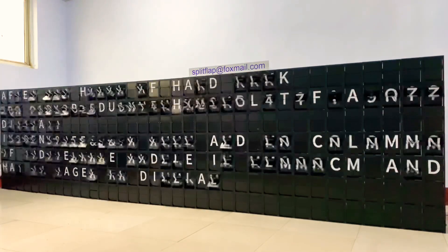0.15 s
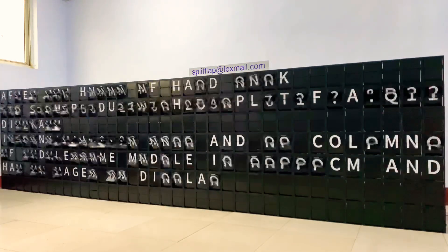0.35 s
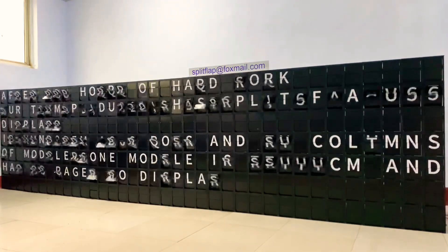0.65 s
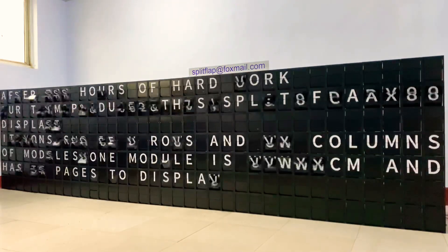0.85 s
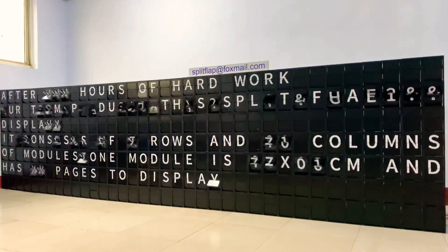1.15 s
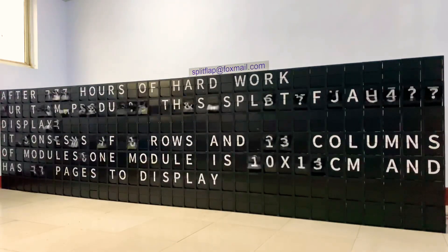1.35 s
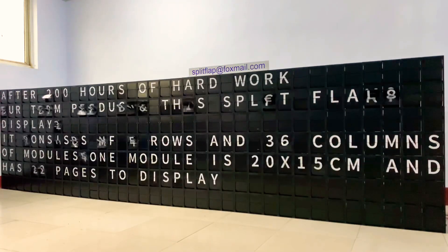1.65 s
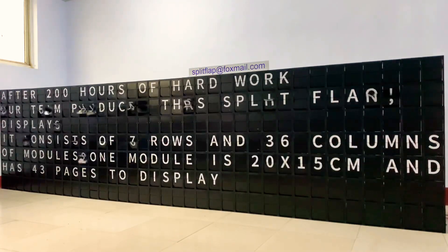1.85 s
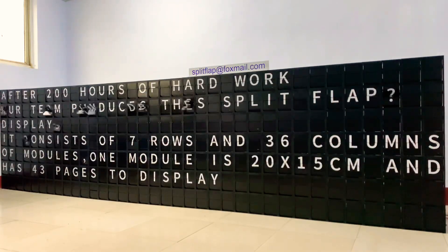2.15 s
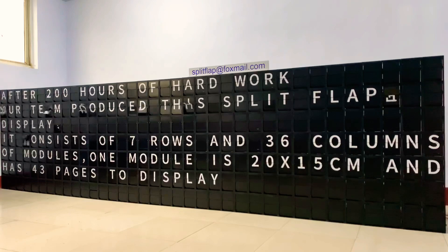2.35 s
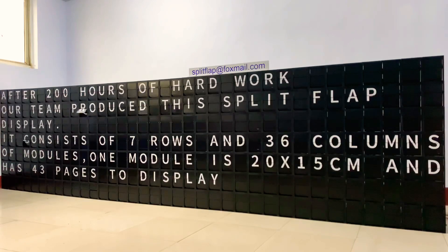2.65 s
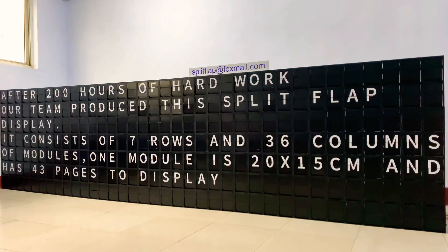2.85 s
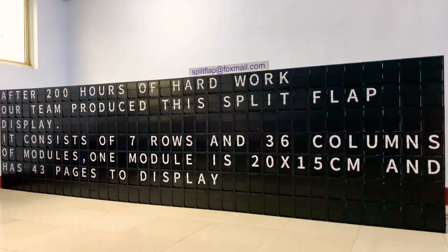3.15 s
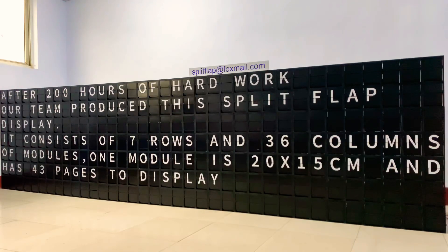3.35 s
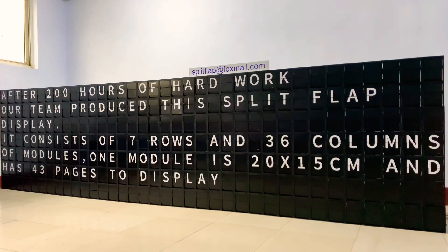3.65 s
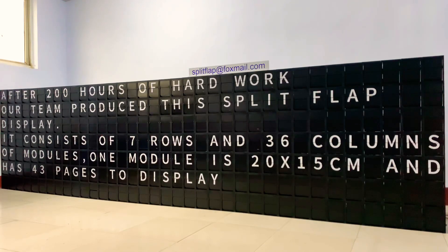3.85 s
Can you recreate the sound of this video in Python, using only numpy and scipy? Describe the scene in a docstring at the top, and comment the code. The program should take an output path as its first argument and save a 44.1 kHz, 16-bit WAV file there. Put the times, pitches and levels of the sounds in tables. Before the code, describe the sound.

A wall-sized split-flap display clatters densely in a bare, echoing room, heard in stereo from a few metres; flaps snap and knock, gradually thin out, tick to a stop, and leave faint low hum and room noise.

```python
"""Plastic flaps clatter on a wall-sized split-flap display in a bare room, heard from a few metres.
Each module drops about 13 flaps a second: short noise snaps that bounce, ring and echo in the room.
Landings also shake the cabinet: low filtered thuds and knocks. Some flaps land hard and stand out.
One by one the modules reach their letters and stop, leaving a wavering low hum (a sine)
and faint room noise (filtered noise) with a soft rush."""
import sys
import numpy as np
from scipy import signal
from scipy.fft import rfft, irfft, next_fast_len
from scipy.io import wavfile

SR = 44100
rng = np.random.default_rng(int(sys.argv[2]) if len(sys.argv) > 2 else 0)


def master(y):
    """Save y as 16-bit WAV."""
    cut = np.clip(np.atleast_2d(y).T, -1, 1)
    pcm = np.round(cut * 32767)  # scale
    wavfile.write(sys.argv[1], SR, pcm.astype(np.int16))


N = 176400  # length in samples: 4 s


def from_db(db):
    """Turn decibels into a gain."""
    return 10 ** (np.asarray(db) / 20)


def rms_one(x):
    """Scale to an rms of one."""
    return x / np.sqrt(np.mean(x ** 2) + 1e-20)


def at_time(rows, t):
    """Read a curve at the given times, with straight lines between its points."""
    return np.interp(t, *np.transpose(rows))


def at_hz(rows, hz):
    """Read a curve over frequency, with pitch steps (log frequency) as the scale."""
    f, value = np.transpose(rows)
    return np.interp(np.log(hz + 1e-9), np.log(f), value)


def colour(x, gain_at):
    """Filter by a gain that depends on frequency."""
    size = next_fast_len(x.shape[-1] + SR // 4)
    hz = np.fft.rfftfreq(size, 1 / SR)
    return irfft(rfft(x, size) * gain_at(hz), size)[..., :x.shape[-1]]


def body(spectrum, resonances, hz):
    """Gain of a broad spectrum with resonant peaks; white noise keeps its power."""
    lift = sum(db / (1 + (2 * (hz - f) / width) ** 2) for f, width, db in resonances)
    return rms_one(from_db(at_hz(spectrum, hz) + lift))


def drift(rate_hz):
    """Random wavering of spread 1; a higher rate makes it quicker."""
    return rms_one(colour(rng.standard_normal(N), lambda hz: np.exp(-hz / rate_hz)))


# How alike left and right are in sound from all around: f/Hz, correlation
EAR_LIKENESS = [(60, 0.9), (250, 0.87), (450, 0.42), (800, 0.17), (2000, 0.014), (14000, .02)]


def diffuse(size):
    """Stereo noise from all around: alike in the bass, nearly unrelated in the treble."""
    mid, side = rng.standard_normal((2, size))
    mid = colour(mid, lambda hz: np.sqrt(1 + np.clip(at_hz(EAR_LIKENESS, hz), -1, 1)))
    side = colour(side, lambda hz: np.sqrt(1 - np.clip(at_hz(EAR_LIKENESS, hz), -1, 1)))
    return np.array([mid + side, mid - side])


# How long the room's echo takes to fall by 60 dB: f/Hz, decay time/s
ECHO_DECAY = [(100, 1), (500, 0.8), (2000, 0.54), (5000, 0.48), (14000, 0.3)]


def room(x, wet_db):
    """Add a diffuse tail that dies sooner in the treble, then scale down to make up for it."""
    t, noise, tail = np.arange(SR) / SR, rfft(diffuse(SR)), 0
    edges = np.geomspace(20, 20000, 11)
    hz = np.fft.rfftfreq(SR, 1 / SR)
    for low, high in zip(edges, edges[1:]):
        decay = from_db(-60 * t / at_hz(ECHO_DECAY, np.sqrt(low * high)))
        band = irfft(noise * (hz >= low) * (hz < high), SR)
        tail = tail + band * decay / np.linalg.norm(decay)
    wet = from_db(wet_db)
    echo = signal.fftconvolve(x, tail, axes=1)[:, :x.shape[1]]
    return (x + wet * echo) / np.hypot(1, wet)


# Colour of the room noise: f/Hz, relative level/dB
AIR_COLOUR = [(25, -12), (42, 3), (60, -8.5), (95, 2.5), (115, -6.5), (150, -11.5), (290, -14), (390, -16),
              (560, -17.5), (840, -24), (1280, -33), (1600, -29), (2000, -32.5), (2900, -33), (4300, -34),
              (6000, -36.5), (8500, -37), (10300, -35), (14400, -38)]
# Faint ringing bands in it: f/Hz, width/Hz, lift/dB
AIR_RINGING = [(569, 13, 8.5), (1282, 124, 13), (2014, 120, 12.5), (2470, 79, 5), (4100, 580, 2.5)]
# Its loudness over time, before the stereo mix and wavering: t/s, level/dB
AIR_LOUDNESS = [(0, -75), (3.1, -70), (3.45, -71), (4, -71)]
AIR_WAVER_DB, AIR_WAVER_HZ = .4, 12


def air():
    """Faint, slightly wavering rumble and hiss of the room: noise filtered into a few ringing bands."""
    noise = colour(diffuse(N), lambda hz: body(AIR_COLOUR, AIR_RINGING, hz))
    level_db = at_time(AIR_LOUDNESS, np.arange(N) / SR) + AIR_WAVER_DB * drift(AIR_WAVER_HZ)
    return noise * from_db(level_db)


# Loudness of the soft rush over time, before the stereo mix: t/s, level/dB
RUSH_LOUDNESS = [(0, -100), (3.45, -96), (3.63, -79), (3.74, -88), (3.93, -77), (4, -76)]
# Its dull colour: f/Hz, relative level/dB
RUSH_COLOUR = [(100, -19), (280, -4), (550, 0), (720, -5), (1000, -14), (2500, -34), (8000, -50)]


def swell():
    """A soft, dull rush that comes and goes late in the background: noise with little treble."""
    noise = colour(diffuse(N), lambda hz: body(RUSH_COLOUR, [], hz))
    return noise * from_db(at_time(RUSH_LOUDNESS, np.arange(N) / SR))


# Loudness of the low hum, before trim and flutter: t/s, level/dB
HUM_LOUDNESS = [(0, -51), (2.3, -56.5), (2.55, -53), (2.85, -53.5), (3.15, -56), (3.28, -65), (3.42, -70),
                (3.53, -63.5), (3.66, -73), (3.8, -68), (3.9, -58), (4, -59)]
HUM_HZ, HUM_WANDER_HZ, HUM_WANDER_RATE_HZ = 80.6, 2.31, 7.3
HUM_TRIM_DB, HUM_FLUTTER_DB, HUM_FLUTTER_HZ = -3.5, 2, 30


def hum():
    """A low sine whose pitch wavers and whose loudness flutters, swells and sinks."""
    pitch_hz = HUM_HZ + HUM_WANDER_HZ * drift(HUM_WANDER_RATE_HZ)
    phase = 2 * np.pi * np.cumsum(pitch_hz) / SR
    level_db = HUM_TRIM_DB + at_time(HUM_LOUDNESS, np.arange(N) / SR)
    level_db = level_db + HUM_FLUTTER_DB * drift(HUM_FLUTTER_HZ)
    return np.sqrt(2) * np.sin(phase) * from_db(level_db)


# Colour of the cabinet's thud: f/Hz, relative level/dB
THUD_COLOUR = [(25, -23), (45, -9), (62, 1.5), (85, -4.5), (110, 1.5), (150, -3.5), (200, -0.5), (290, 1),
               (400, -1), (520, -3), (700, -14), (1500, -24), (5000, -73)]
# Resonances of flaps and housings: f/Hz, width/Hz, lift/dB
HOUSING_RESONANCES = [(270, 30, 1), (910, 74, -1), (1083, 20, 1.5), (2080, 62, 4), (3610, 160, 5),
                      (4750, 220, -2.5), (8730, 750, 2.5)]
THUD_ROOM_DB = -0.5


def cabinet(clicks):
    """The low, boxy answer of the cabinet to the landing flaps, in the room."""
    boxy = colour(clicks, lambda hz: body(THUD_COLOUR, HOUSING_RESONANCES, hz))
    return room(boxy, THUD_ROOM_DB)[:, SR:]


# Heavier knocks of the cabinet, before the room: t/s, level/dB (of the whole knock's energy)
CABINET_KNOCKS = [(0.044, -14), (0.193, -13), (0.283, -13), (0.422, -12.5), (0.474, -23), (0.582, -28),
                  (0.725, -11), (0.806, -25), (0.862, -20), (1.165, -19), (1.902, -22.5), (2.552, -24),
                  (2.72, -28), (2.796, -29), (2.818, -30), (2.94, -35)]
KNOCK_RISE_S, KNOCK_TOP_HZ = 0.0029, 520


def knocks():
    """Heavier knocks stand out of the clatter: each a short, dull shudder of the cabinet."""
    t, out = np.arange(SR // 25) / SR, np.zeros(N + SR)
    dull = lambda hz: body(THUD_COLOUR, [], hz) / np.hypot(1, (hz / KNOCK_TOP_HZ) ** 3)
    for s, db in CABINET_KNOCKS:
        shudder = colour(rng.standard_normal(len(t)), dull)
        shudder *= t * np.exp(-t / KNOCK_RISE_S)  # swells, then dies away
        at = int((s + 1) * SR)
        out[at:at + len(t)] += from_db(db) * shudder / np.linalg.norm(shudder)
    return room(np.array([out, out]), wet_db=-3)[:, SR:]


BOUNCE_S, BOUNCE_LOSS_DB = .008, 4  # typical time between bounces, loss at each


def contacts(falls, count):
    """Stereo clicks, starting a second early: each flap lands and bounces, weaker every time."""
    s, strength, lag = falls.T
    out = np.zeros((2, N + SR))
    gap = rng.uniform(.5, 1.5, (count, len(s)))
    sign = rng.choice([-1, 1], (count, len(s)))
    for k in range(count):
        click = sign[k] * strength * from_db(-BOUNCE_LOSS_DB * k)
        for ear, delay in enumerate((lag, 0)):  # the left ear hears it later
            at = ((s + 1 + k * BOUNCE_S * gap[k] + delay) * SR).astype(int)
            np.add.at(out[ear], np.clip(at, 0, N + SR - 1), click)
    return out


WALL_LAG_S, WALL_LAG_SPREAD_S = .00028, .00008  # lag of the left ear, and its reach over the wall
SLAP_ROOM_DB = 10  # room tail of the slapping flaps
# Flaps of the last modules, before the room: t/s, level/dB
FINAL_FLAPS = [(2.709, -31.5), (2.718, -38), (2.728, -41), (2.742, -40), (2.765, -41), (2.785, -38),
               (2.8, -37), (2.82, -44)]
# Their colour: f/Hz, relative level/dB
FINAL_COLOUR = [(400, 6.5), (900, 4), (1500, 1), (2400, 0.5), (3500, -1.5), (5000, -3), (9000, -12),
                (14000, -17)]


def last_flaps():
    """The last modules tick on alone for a moment: bouncing clicks, coloured and echoing."""
    falls = np.array([(s, from_db(db), WALL_LAG_S) for s, db in FINAL_FLAPS])
    ticks = colour(contacts(falls, count=3), lambda hz: body(FINAL_COLOUR, [], hz))
    return room(ticks, SLAP_ROOM_DB)[:, SR:]


# Colour of the slapping flaps: f/Hz, relative level/dB
SLAP_COLOUR = [(300, -22), (500, -6), (650, -1.5), (900, 3), (1200, -1.5), (1480, 0), (1850, -5),
               (2100, -3), (2630, -4.5), (3600, -7.5), (4600, -7.5), (5300, -11.5), (8700, -13.5)]
# The same colour at the very top: f/Hz, relative level/dB
SLAP_TREBLE = [(10200, -14.3), (13300, -16), (14400, -17.5)]
# Flaps that land hard enough to stand out: t/s, level/dB (before the room), centre of the lift f/Hz
HARD_LANDINGS = [(.053, -22, 1500), (.332, -15, 1860), (.472, -26, 1100), (.684, -19.5, 1500),
                 (.761, -19, 2140), (1.057, -17, 1000), (1.575, -22, 1400), (1.736, -27, 2100),
                 (1.945, -26, 1200), (2.706, -34.5, 8900), (2.736, -36.5, 2800)]
CLACK_WIDTH_OCTAVES, CLACK_LIFT_DB, CLACK_ROOM_DB = 0.34, 10.5, 4.5


def clacks():
    """Hard landings, drier than the slaps, each lifted around a pitch of its own."""
    out = 0
    for s, db, centre_hz in HARD_LANDINGS:
        octaves = lambda hz: np.log2((hz + 1) / centre_hz)
        lift = lambda hz: from_db(CLACK_LIFT_DB * np.exp(-(octaves(hz) / CLACK_WIDTH_OCTAVES) ** 2))
        hit = contacts(np.array([(s, from_db(db), WALL_LAG_S)]), count=3)
        out = out + colour(hit, lambda hz: rms_one(body(SLAP_COLOUR + SLAP_TREBLE, [], hz) * lift(hz)))
    return room(out, CLACK_ROOM_DB)[:, SR:]


# Loudness of all running modules together, before random spread and trims: t/s, level/dB
CLATTER_LOUDNESS = [(0, -38.5), (.45, -39.5), (.85, -42.5), (1.25, -44), (1.7, -46.5), (2.1, -49),
                    (2.3, -51.5), (2.5, -55), (2.6, -58.5), (2.66, -70)]
MODULE_COUNT, FLAPS_PER_S, SPEED_SPREAD = 60, 13.5, .015  # the spread is a share of the speed
MODULE_SPREAD_DB, FLAP_SPREAD_DB = 3.5, 2
ALL_STOPPED_S, LEAD_IN_S = 2.66, .5  # the flaps already run before the sound starts


def flap_falls():
    """Every module flips steadily until its letter shows: rows (t/s, strength, left-ear lag/s)."""
    grid = np.linspace(0, ALL_STOPPED_S, 200)
    power = np.minimum.accumulate(from_db(at_time(CLATTER_LOUDNESS, grid)) ** 2)
    running = np.ceil(MODULE_COUNT * np.sqrt(power / power[0]))
    turns, rows = np.arange(48), []
    for k in range(MODULE_COUNT):
        speed, size, place = rng.standard_normal(3)
        jitter, force = rng.standard_normal((2, len(turns)))
        rate = FLAPS_PER_S * (1 + SPEED_SPREAD * speed)
        s = (turns + rng.random() + .04 * jitter) / rate - LEAD_IN_S
        strength = from_db(MODULE_SPREAD_DB * np.tanh(size) + FLAP_SPREAD_DB * force - FLAP_SPREAD_DB)
        # share the total loudness among the modules still running
        share = np.sqrt(SR / FLAPS_PER_S / np.interp(s, grid, running))
        strength *= from_db(at_time(CLATTER_LOUDNESS, s)) * share
        stop_s = grid[running > k].max(initial=0)
        lag = np.full(len(s), WALL_LAG_S + WALL_LAG_SPREAD_S * np.tanh(place))
        rows += list(np.transpose([s, strength * (s < stop_s), lag]))
    return np.array(rows)


THUD_TRIM_DB, THUD_FOLLOWS = -4.5, 0.86  # the thud falls 0.86 dB for each dB of clatter


def thuds(falls):
    """Each landing also shakes the cabinet; this fades a little more slowly than the slapping."""
    fall_db = at_time(CLATTER_LOUDNESS, np.arange(N) / SR) - CLATTER_LOUDNESS[0][1]
    gain = from_db(THUD_TRIM_DB + (THUD_FOLLOWS - 1) * fall_db)
    return cabinet(contacts(falls * [1, 1, 0], count=1)) * gain  # no lag between the ears


SNAP_S = 0.00022  # time for a snap to fade to about a third


def snaps(falls, count):
    """Plastic on plastic: very short noise snaps in several random shades."""
    t, out = np.arange(SR // 500) / SR, 0
    for group in np.array_split(rng.permutation(falls), count):
        snap = rng.standard_normal(len(t)) * np.exp(-t / SNAP_S)
        snap = snap / np.linalg.norm(snap)
        out = out + signal.oaconvolve(contacts(group, count=3), [snap], axes=1)
    return out


SLAP_TRIM_DB, SLAP_LOW_HZ = -0.5, 506


def slaps(falls, tuning):
    """Landing flaps ring with their resonances, shifted by the tuning factor, and fill the room."""
    peaks = [(hz * tuning, width, db) for hz, width, db in HOUSING_RESONANCES]
    out = colour(snaps(falls, count=7), lambda hz: body(SLAP_COLOUR + SLAP_TREBLE, peaks, hz))
    low_cut = signal.butter(2, SLAP_LOW_HZ, "high", fs=SR, output="sos")
    out = signal.sosfilt(low_cut, out)
    return from_db(SLAP_TRIM_DB) * room(out, SLAP_ROOM_DB)[:, SR:SR + N]


TUNING_SPREAD = 0.0067  # the resonances differ from one part of the wall to another


def display(count):
    """The flaps are dealt into groups, each with its own slap tuning and its own room reflections."""
    groups = np.array_split(rng.permutation(flap_falls()), count)
    tunings = 1 + TUNING_SPREAD * np.linspace(-1, 1, count)
    return sum(slaps(group, tuning) + thuds(group) for group, tuning in zip(groups, tunings))


def scene():
    """The display's clatter over the room's hum and air."""
    background = air() + swell() + hum()
    return background + knocks() + last_flaps() + clacks() + display(count=5)


# Stereo treble: the left channel takes a share of the right's sound, slightly late:
# f/Hz, share (0 to 1)
SHARED_TREBLE = [(2500, 0), (4500, 0.02), (7000, 0), (8600, 0.48), (10000, 1), (11500, 1)]
# Left minus right: f/Hz, level/dB
EAR_BALANCE = [(60, -4.5), (250, -1), (700, 1.1), (2500, 1.5), (6000, -0.5), (9000, -1.3), (13000, 0)]
SHARED_LAG_S, CUTOFF_HZ = .000296, 14500


def record(dry):
    """The left channel takes some of the right's treble, late; the two differ in colour; the top is cut."""
    share = lambda hz: np.clip(at_hz(SHARED_TREBLE, hz), 0, 1)
    late = lambda hz: np.exp(-2j * np.pi * hz * SHARED_LAG_S)
    left = colour(dry[0], lambda hz: np.sqrt(1 - share(hz) ** 2))
    left += colour(dry[1], lambda hz: share(hz) * late(hz))
    halves = np.array([[.5], [-.5]])  # half the difference to each side
    heard = colour(np.array([left, dry[1]]), lambda hz: from_db(at_hz(EAR_BALANCE, hz) * halves))
    steep_cut = signal.ellip(12, .2, 80, CUTOFF_HZ, fs=SR, output="sos")
    return signal.sosfilt(steep_cut, heard)


dry = scene()
out = record(dry)
master(out)
```